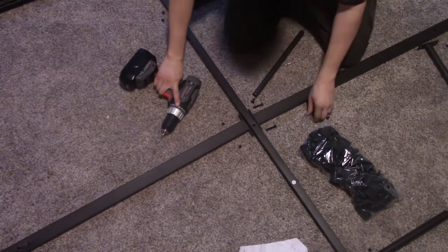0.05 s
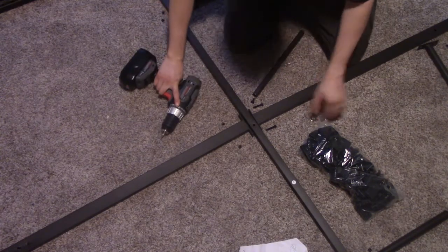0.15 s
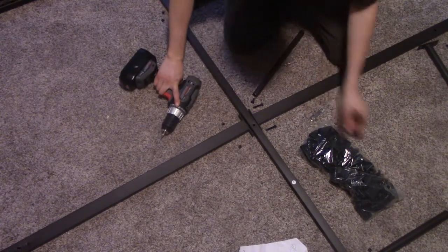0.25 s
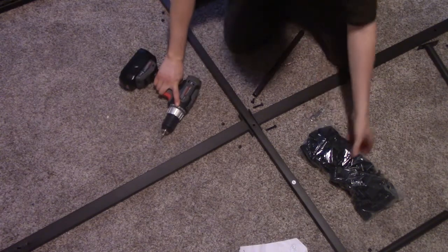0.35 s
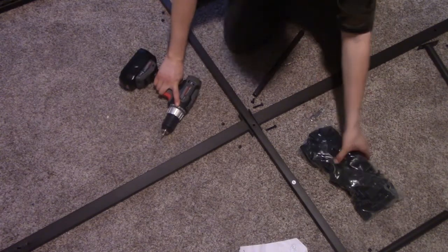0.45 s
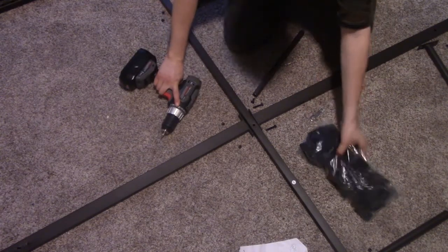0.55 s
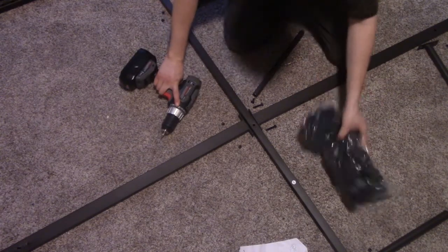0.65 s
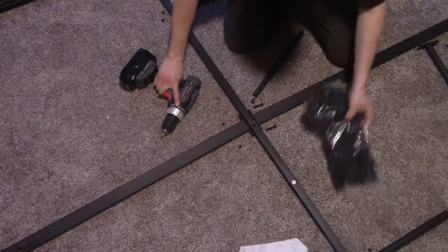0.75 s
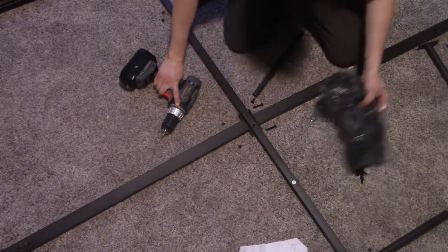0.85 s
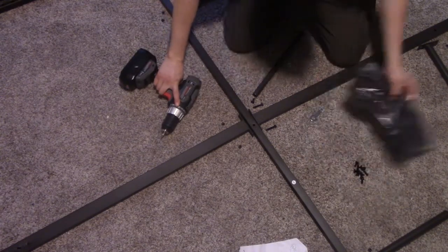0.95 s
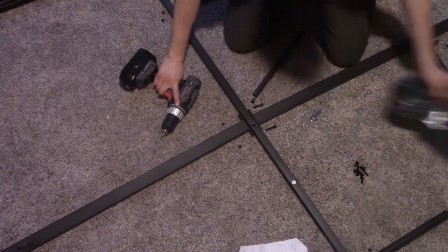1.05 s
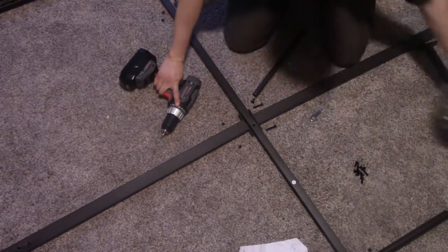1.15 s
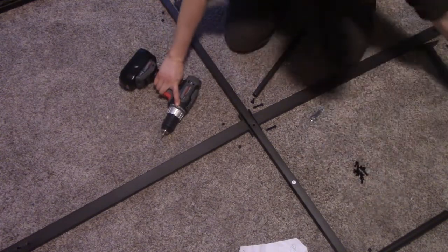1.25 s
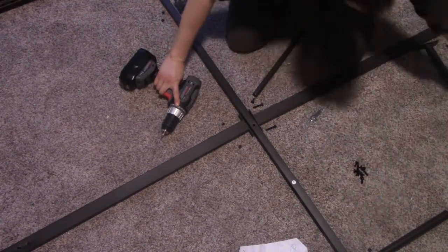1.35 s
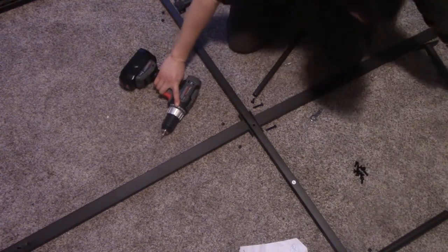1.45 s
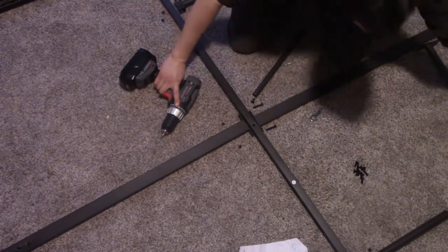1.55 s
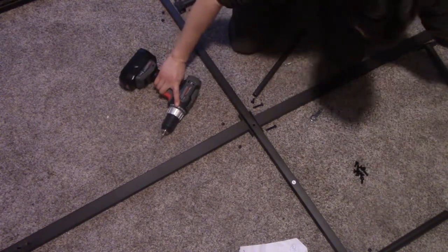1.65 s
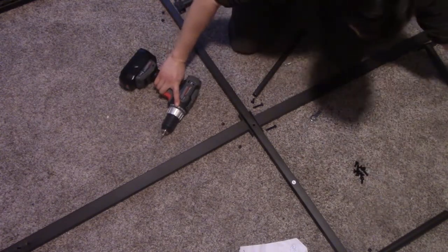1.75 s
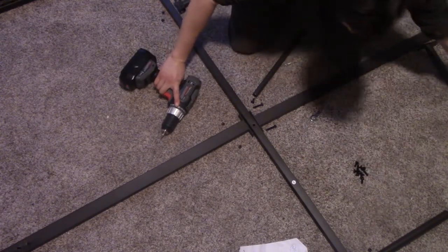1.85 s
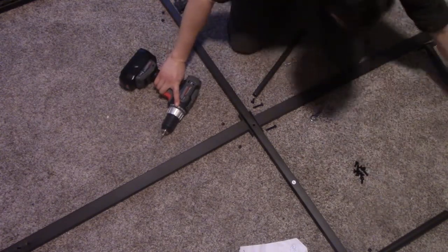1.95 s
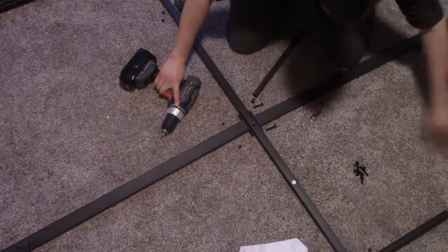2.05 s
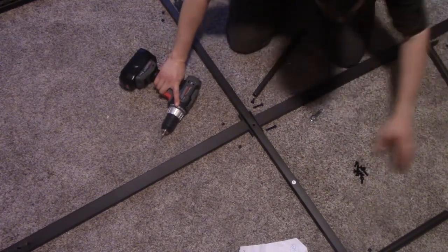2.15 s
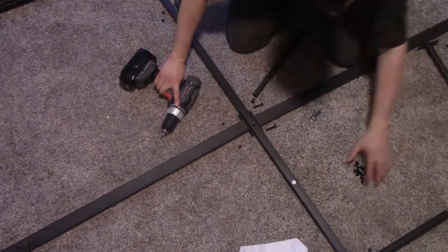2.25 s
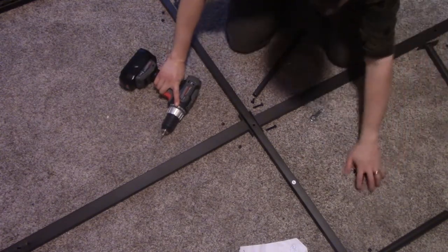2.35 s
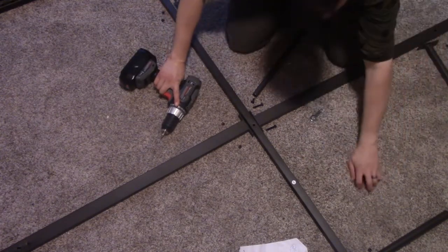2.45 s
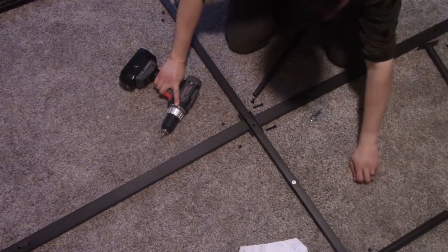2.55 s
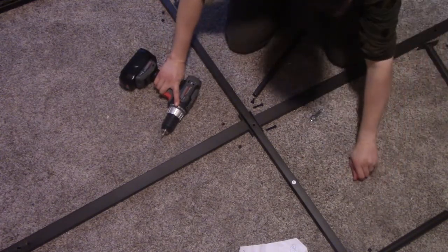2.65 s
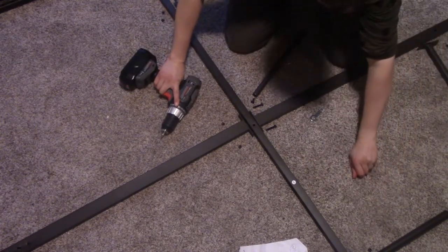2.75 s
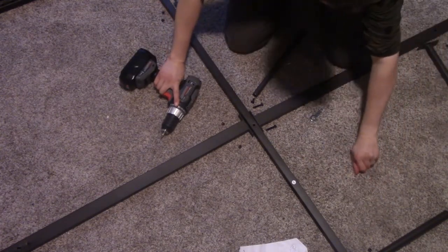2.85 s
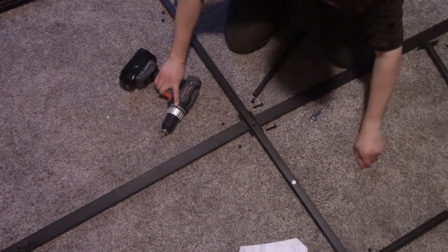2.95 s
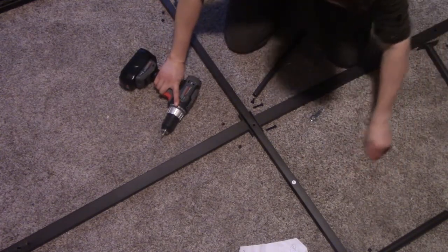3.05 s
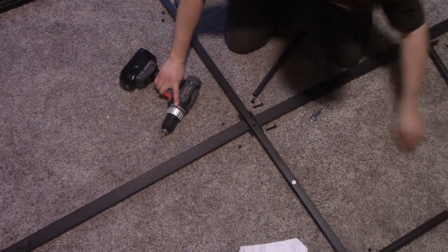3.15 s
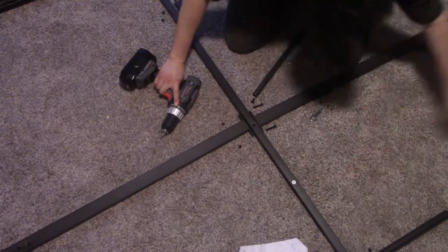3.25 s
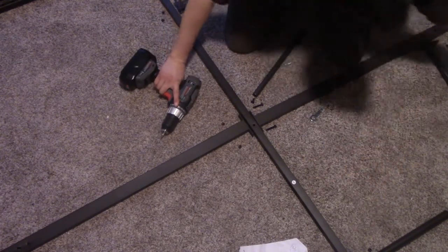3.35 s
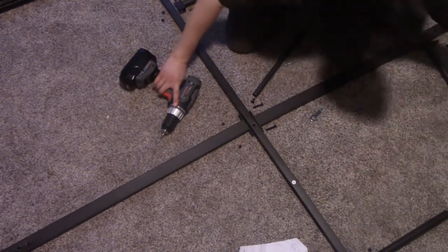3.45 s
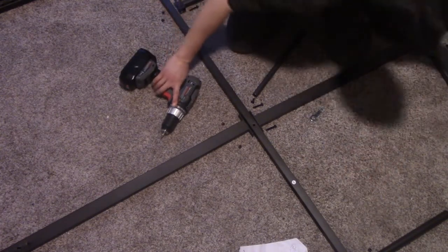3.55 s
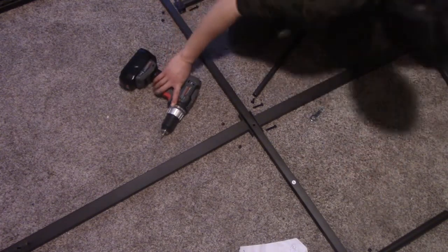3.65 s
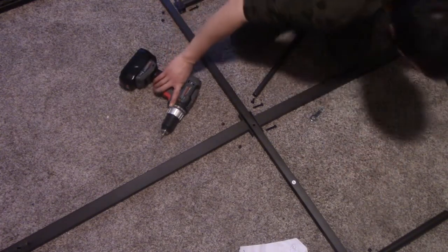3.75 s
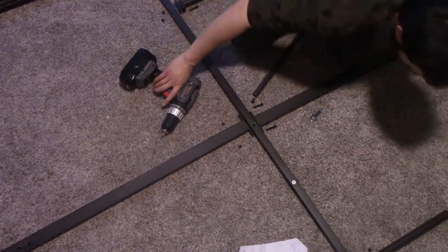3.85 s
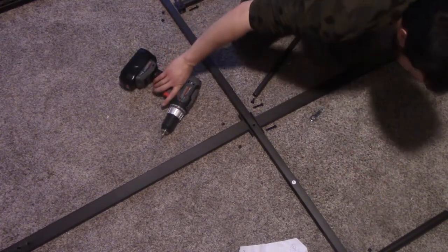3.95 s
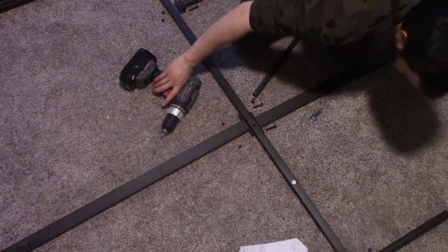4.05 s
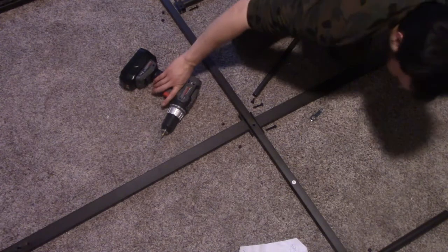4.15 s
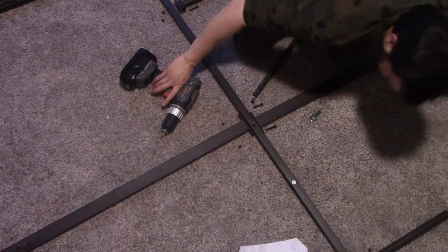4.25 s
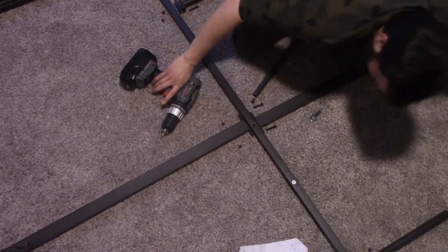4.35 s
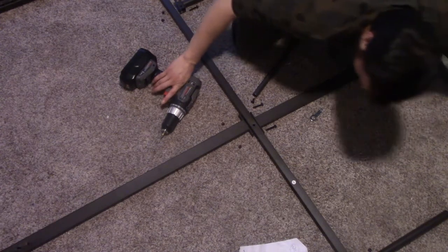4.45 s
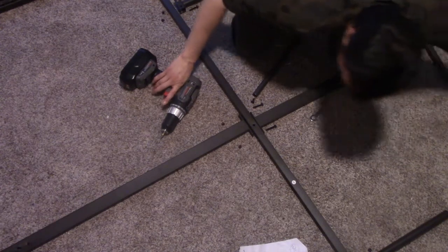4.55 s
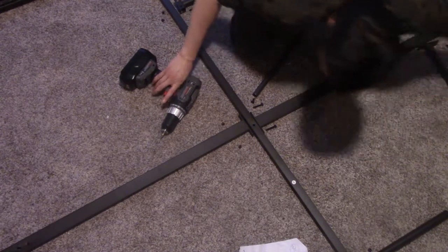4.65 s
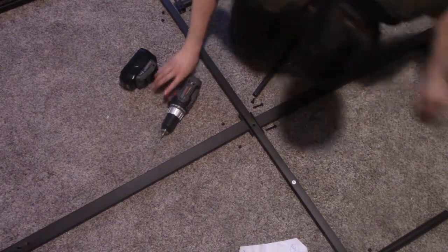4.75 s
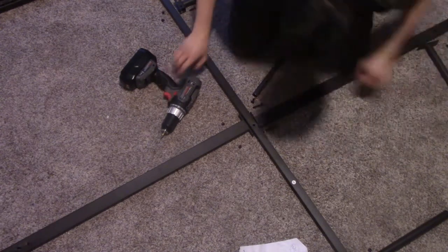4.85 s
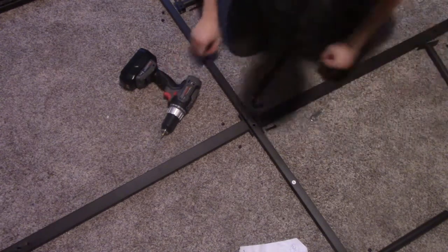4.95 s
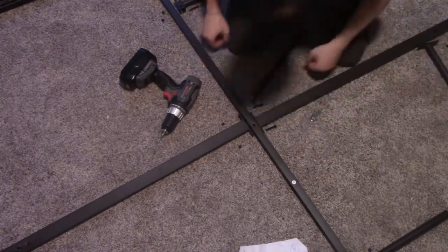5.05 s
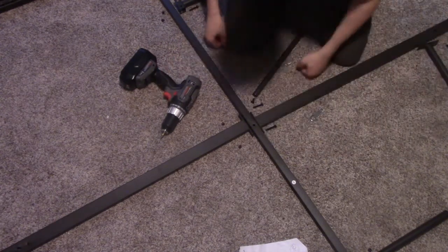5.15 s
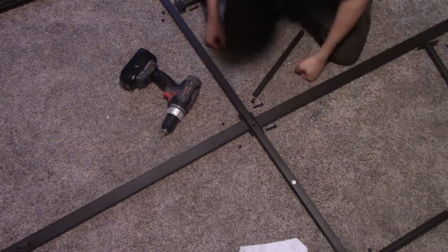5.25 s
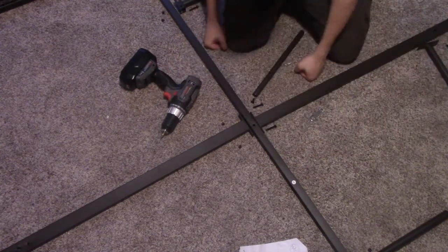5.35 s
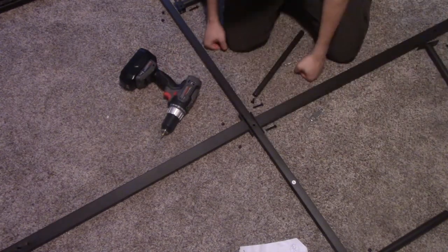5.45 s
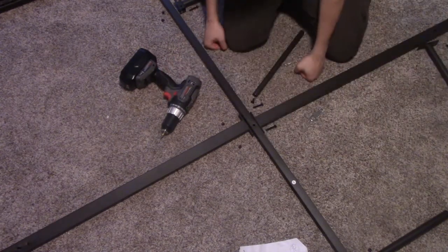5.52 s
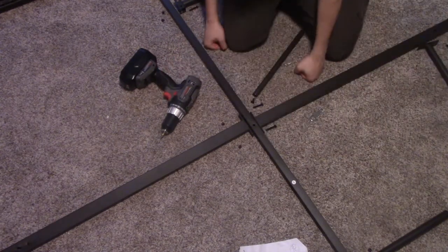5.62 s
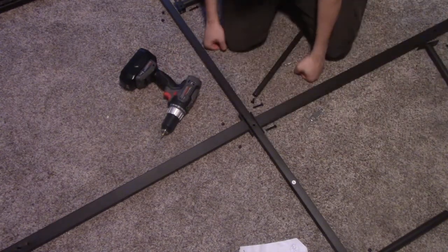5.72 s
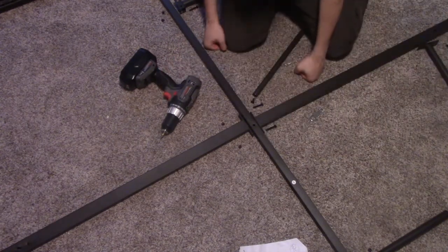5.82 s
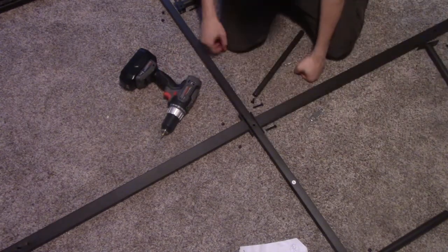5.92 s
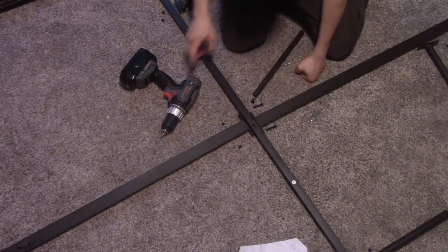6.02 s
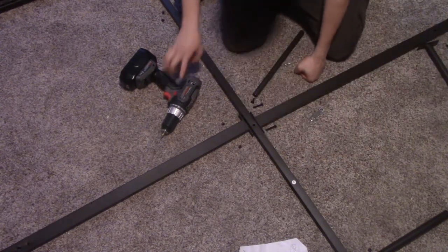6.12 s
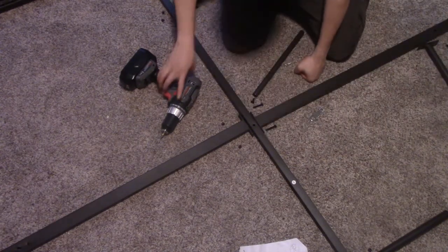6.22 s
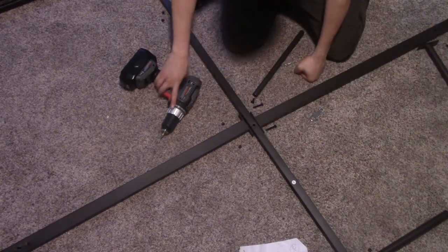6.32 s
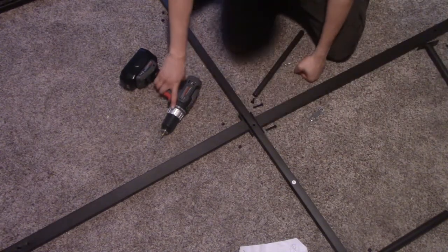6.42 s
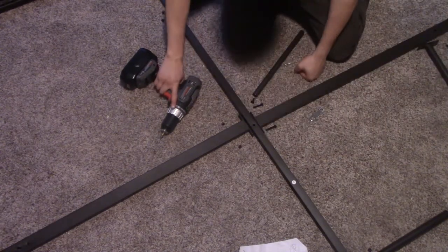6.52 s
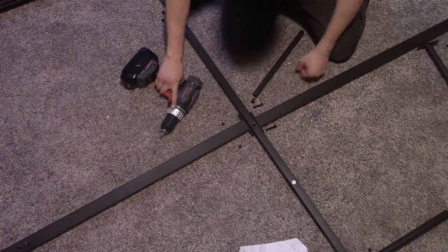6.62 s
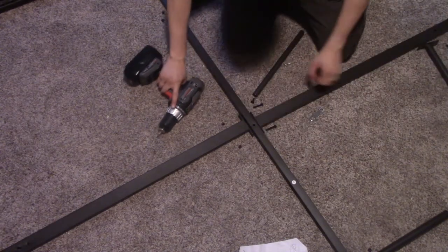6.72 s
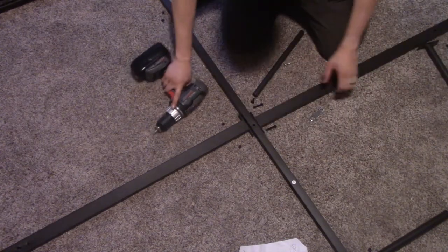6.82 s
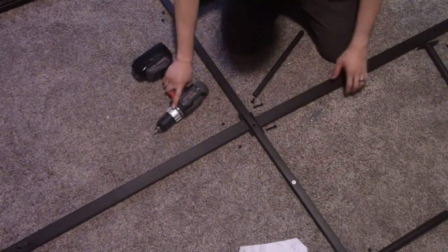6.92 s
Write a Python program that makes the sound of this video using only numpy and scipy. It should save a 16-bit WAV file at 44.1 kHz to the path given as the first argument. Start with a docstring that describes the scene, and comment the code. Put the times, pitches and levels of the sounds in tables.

```python
"""Someone kneeling on carpet assembles a metal bed frame. A plastic bag of hardware is grabbed, carried aside and
dropped: its film crinkles in streams of tiny snaps, and its steel parts clack as sums of dying modes. Loose bolts,
heard as ticks and damped beating tones, jingle while a hand sweeps them over the pile, a rustle of fine grains.
The bag is crushed again and let go, then clothes shift in fine rustles. Soft low modes bump the floor now and then;
dense reflections of filtered noise follow every source, over a steady hush with a faint whirr."""
import sys
import numpy as np
from scipy import signal
from scipy.fft import rfft, irfft
from scipy.io import wavfile

SR = 44100
rng = np.random.default_rng(int(sys.argv[2]) if len(sys.argv) > 2 else 0)


def inscribe(sig):
    """Save sig as 16-bit PCM at rate SR to the path in sys.argv[1].

    A 1-D sig is mono; a 2-D sig holds one channel per row.
    Samples are clipped to [-1, 1] before scaling.
    """
    pcm = np.round(np.clip(np.atleast_2d(sig).T, -1, 1) * 32767)
    wavfile.write(sys.argv[1], SR, pcm.astype(np.int16))


N = 307818
TIME = np.arange(N) / SR  # s

# The bag is grabbed, carried aside, dropped, touched, crushed, let go and left to settle.
# Each row: start in seconds, rise in seconds, hold in seconds, fade in dB per second, level in dB,
# hollow body in dB relative, crispness in dB relative, share packed round the hardware from 0 to 1.
BAG_SQUEEZES = [(0.403, .018, 0.15, 51.5, -35, -4, -6, 0.15), (1.04, 0.2, 0.2, 61.5, -44, -5.5, -8.5, 0.18),
                (1.511, 0.018, 0.036, 382, -18, -7, -10.5, 0.9),
                (3.831, 0.0041, 0.0043, 330, -46, -19, -20, 1),
                (3.973, .022, 0.018, 75, -27.8, -8, -11.5, 1),
                (4.251, 0.096, 0.053, 230, -43.5, -2, -9, 0.87),
                (4.486, 0.017, .01, 200, -58.5, -1, -6, 0.8)]
# Colour of the plastic film held loose. Each row: frequency in Hz, gain in dB.
LOOSE_FILM_COLOUR = [(20, -59), (60, -41.5), (110, -22.5), (190, -5.5), (330, -2), (900, -4.5), (1500, 3.5),
                     (2650, 3), (3500, -3), (5300, -12.5), (9500, -16), (12000, -26), (15500, -32.5)]
# Colour of the film packed round the hardware. Each row: frequency in Hz, gain in dB.
PACKED_FILM_COLOUR = [(20, -65), (55, -39), (110, -16), (210, -11.5), (450, -6.5), (700, -4), (1500, -7),
                      (2300, -4), (3300, -8), (5700, -17.5), (10000, -25), (12000, -31.5), (15500, -45.5)]
BODY_LAG_S, BODY_FADE_SHARE = 0.0058, 0.82  # broad folds start later than creases and fade at this share of their speed
LIGHT_SNAPS_PER_S, FORCE_SNAPS_PER_S = 900, 20000  # creases snapping under the lightest touch, and more at full level

# Sharp cracks from single folds snapping over or fingers tapping.
# Each row: start in seconds, peak in dB before the microphone response, treble in dB relative.
FOLD_SNAPS = [(0.413, -31, -22), (0.555, -14, -16.5), (0.692, -14, -31), (0.76, -26, -20),
              (0.827, -19.5, -11.5), (0.965, -20.5, -8), (1.255, -29.5, -13), (1.378, -22, -35),
              (2.747, -32, -19), (2.804, -32, -12), (3.835, -28, -12), (3.97, -25.5, -9),
              (3.979, -24, -23.5), (3.991, -12.5, -49), (3.9963, -23, -30), (4.07, -15.5, -9),
              (4.697, -38, -3), (6.238, -36, -24)]
SNAP_HZ = 2300  # the filter of a crack turns from its low end to its treble here

# The hardest knocks between the parts in the bag. Each row: start in seconds, strength in dB before the trim.
HARD_KNOCKS = [(1.5285, -8), (1.538, -3.5), (1.5433, -1.7), (1.5455, -3.5), (1.559, -3), (1.564, -9),
               (1.575, -10.5), (1.587, -11.5), (1.598, -17), (1.65, -27.5), (3.835, -30), (3.997, -9.5),
               (4.068, -17), (4.110, -17.5), (4.510, -36.5)]
# Modes of those steel parts at their middle pitch. Each row: frequency in Hz, level in dB, 60 dB decay in seconds.
STEEL_MODES = [(685, -40, .15), (1539, -23, .06), (1766, -28, 0.23), (1910, -20.5, .08), (2170, -25.5, .14),
               (2318, -20.5, .11), (2327, -21, .12), (2368, 1, 0.013), (2550, -15, .1), (2770, -16, .09),
               (2910, -26, .08), (3250, -19.5, .08), (4100, -17, 0.048), (4540, -17, .03),
               (6800, -19.5, .012), (8000, -24.5, .01)]
# Lesser knocks as a packed bag is moved: rate, level over the squeeze before the trim, scatter, share of detuning.
RATTLE_PER_S, RATTLE_DB, RATTLE_SPREAD_DB, RATTLE_DETUNE = 130, 1, 3, .07

# Bolts touching. Each row: start in seconds, level in dB before the trim, pitch in Hz,
# time in seconds until fingers or neighbours have stilled it.
BOLT_TOUCHES = [(0.836, -28.5, 10430, 0.091), (2.396, -58, 10450, .065), (2.481, -24, 10400, 0.0035),
                (2.548, -28, 9200, 0.0057), (2.6, -39, 10160, 0.017), (2.746, -28, 9370, .003),
                (2.749, -25, 7500, 0.0034), (2.804, -37, 8100, .004), (2.827, -33, 7200, 0.0054),
                (2.886, -19.5, 6760, .0022), (3.445, -30, 9700, 0.0053), (3.677, -45, 10450, .024),
                (3.713, -33, 6370, .007), (4.201, -31, 10430, 0.23)]
HALF_CLEAN_S = 0.023  # a bolt left free this long is half ring, half tick
# Small touches while the bolts are swept together: middle values and scatter, the level before the trim.
JINGLE_START_S, JINGLE_PER_S, JINGLE_STILL_S = 2.468, 54, 0.0044
JINGLE_DB, JINGLE_SPREAD_DB, JINGLE_HZ, JINGLE_SPREAD_HZ = -32.5, 8, 10550, 250

# A hand sweeps the bolts together, then closes on them.
# Each row: middle in seconds, length in seconds, level in dB, body in dB relative, pile hiss in dB relative.
HAND_SWEEPS = [(2.5, .45, -55.5, 5.5, -8.5), (2.87, .41, -58, 7.5, -35)]
# Colour of rubbed carpet pile. Each row: frequency in Hz, gain in dB.
CARPET_COLOUR = [(20, -54.5), (60, -11), (110, -2), (170, -2), (400, 2), (570, 4), (1000, -1), (1600, -5),
                 (3000, -13), (5000, -27), (6500, -18), (10500, -27), (15500, -37)]
# Sleeves and trousers shift.
# Each row: middle in seconds, length in seconds, level in dB, body in dB relative, hiss in dB relative.
CLOTHES_SHIFTS = [(3.705, 0.1, -57.5, 1, -5.5), (3.88, .26, -60.5, 1.5, -9), (5.13, .5, -67, 2, -4),
                  (5.62, .24, -66, 4, -10), (6.255, .05, -57, 1, -12), (6.36, .34, -69.5, 5.5, -4.5),
                  (6.73, 0.45, -62.5, -1, -9.5)]
# Colour of rubbed cloth. Each row: frequency in Hz, gain in dB.
CLOTH_COLOUR = [(20, -43), (100, -4.5), (200, -1.5), (450, -0.5), (1000, -2), (2400, -3.5), (3500, -12),
                (6000, -20.5), (10000, -24), (15500, -47)]
ARCH_POWER = 1.16  # of the half sine that a stroke swells and fades by

# Knees, knuckles and the drill bumping the floor.
# Each row: start in seconds, level in dB before the trim and soft onset, mode frequency in Hz.
FLOOR_BUMPS = [(1.532, -33, 215), (2.37, -46, 202), (2.471, -40, 170), (2.598, -37.5, 154),
               (3.70, -43.5, 248), (5.089, -42, 180), (6.245, -43, 210)]
BUMP_T60_S = .15

# Reverberation of the room. Each row: frequency in Hz, 60 dB decay in seconds.
ROOM_DECAY = [(100, 0.35), (400, 0.68), (1000, 0.98), (2700, 0.7), (5500, 0.76), (8000, 0.52),
              (14000, 0.41)]
# Width of the echoes before a small lift. Each row: frequency in Hz, side over mid in dB.
ECHO_SPREAD = [(30, -20), (160, -19.5), (1000, -21.5), (2500, -18), (5000, -11), (9000, -10.5),
               (15000, -17.5)]
# Colour of the room tone. Each row: frequency in Hz, relative density in dB per Hz.
HUSH_COLOUR = [(15, -51), (25, -20.5), (49, -20), (133, -6.5), (209, -3), (281, -4), (378, -2), (410, -4),
               (469, -4.5), (509, -4), (895, -7.5), (1200, -8.5), (2060, -13), (5430, -20), (15500, -32.5)]
HUSH_RMS_DB = -58.5
# Width of the room tone. Each row: frequency in Hz, side over mid in dB.
ROOM_TONE_SPREAD = [(60, -1.5), (130, -7), (290, -6), (640, -6.5), (1410, -8.5), (3100, -9), (6820, -10),
                    (15000, -22)]
# The microphones lose the deep bass, and a standing wave of the room lifts the low notes.
# Each row: frequency in Hz, gain in dB.
MICROPHONE_RESPONSE = [(15, -41), (40, -26.5), (70, -11), (110, -5), (160, -2), (215, 1), (330, 0.5),
                       (450, 0), (16000, 0)]
EDGE_HZ = 15850  # upper band limit


def amp(db):
    """Logarithmic level: decibels become a linear amplitude ratio."""
    return 10 ** (np.asarray(db) / 20)


def read(points, hz):
    """Log-frequency interpolation: a table of (Hz, value) is joined by straight lines."""
    f, value = np.transpose(points)
    return np.interp(np.log(hz + 1), np.log(f + 1), value)


def evened(x):
    """Power normalisation: the signal is scaled to rms 1."""
    return x / np.sqrt(np.mean(x ** 2) + 1e-20)


def add(mix, s, sound):
    """Superposition: a sound is summed into the mix at time s."""
    part = mix[round(s * SR):][:len(sound)]
    part += sound[:len(part)]


def colour(x, points, size=4096):
    """Minimum-phase filtering: a (Hz, dB) magnitude fixes a causal response through the Hilbert transform."""
    log_gain = np.log(amp(read(points, abs(np.fft.fftfreq(size, 1 / SR)))))
    spectrum = np.exp(np.conj(signal.hilbert(log_gain)))
    taps = np.fft.ifft(spectrum).real[:size // 2]
    return signal.oaconvolve(x, taps)[:len(x)]


def band(x, lo_hz, hi_hz):
    """Band-pass filtering: the spectrum is kept between two soft edges."""
    hz = np.fft.rfftfreq(len(x), 1 / SR) + 0.0011  # offset avoids division by zero
    passed = rfft(x) / (1 + (lo_hz / hz) ** 8) / (1 + (hz / hi_hz) ** 8)
    return irfft(passed, len(x))


def ring(t, hz, t60):
    """Damped resonance: a mode is a sine that loses 60 dB in t60 seconds."""
    return np.sin(2 * np.pi * hz * t) * np.exp(-np.log(1000) * t / t60)


def crackle(length, per_s, spread_db, grain_s, count=16):
    """Shot noise: uneven tiny snaps fall at random, each from one of a few folds with its own short random shape."""
    t = np.arange(256) / SR
    happens = rng.random(length) < per_s / SR
    size = amp(spread_db * np.minimum(rng.exponential(1, length), 4.5)) * happens
    fold = rng.integers(0, count, length)
    shapes = rng.standard_normal((count, len(t))) * np.exp(-t / grain_s)
    return sum(signal.oaconvolve(size * (fold == k), evened(shapes[k]))[:length] for k in range(count))


def rustle(material, body, mid, crisp, per_s, spread_db):
    """Scale of the radiator: broad folds give a stream of snaps its body, tight creases its crisp top."""
    x = colour(crackle(len(mid), per_s, spread_db, grain_s=0.00064), material)
    low = evened(band(x, 0, 1100))
    middle = evened(band(x, 1100, 5200))
    top = evened(band(x, 5200, SR))
    return body * low + mid * middle + crisp * top


def envelope(t, rise_s, hold_s, fade_db_per_s):
    """Attack and exponential decay: the amplitude rises in a straight line, holds, then dies away."""
    rise = np.clip(t / rise_s, 0, 1)
    return rise * amp(-fade_db_per_s * np.maximum(t - rise_s - hold_s, 0))


def bag(uneven_db=1.5, slips_per_s=35):
    """Buckling of thin film: each squeeze snaps creases, more densely the harder it is; the grip slips unevenly."""
    out, t = np.zeros(N), np.arange(SR) / SR
    hz = np.geomspace(20, 15500, 80)
    for s, rise_s, hold_s, fade, db, body_db, crisp_db, packed in BAG_SQUEEZES:
        film_db = (1 - packed) * read(LOOSE_FILM_COLOUR, hz) + packed * read(PACKED_FILM_COLOUR, hz)
        film = np.transpose([hz, film_db])
        slips = rng.standard_normal(size=128)
        force = amp(db + uneven_db * np.interp(t * slips_per_s, np.arange(len(slips)), slips))
        creases = force * envelope(t, rise_s, hold_s, fade)
        folds = force * envelope(t - BODY_LAG_S, rise_s, hold_s, fade * BODY_FADE_SHARE)
        per_s = LIGHT_SNAPS_PER_S + FORCE_SNAPS_PER_S * amp(db)
        body, crisp = amp(body_db) * folds, amp(crisp_db) * creases
        add(out, s, rustle(film, body, creases, crisp, per_s, spread_db=2.0))
    return out


def snaps(decay_s=.0007, low_db=-10, grit_db=-7):
    """Snap-through or impact: a single fold or fingertip gives one sharp kick and a millisecond or so of grit."""
    out, t = np.zeros(N), np.arange(1024) / SR
    for s, db, treble_db in FOLD_SNAPS:
        kick = (t == 0) + amp(grit_db) * rng.standard_normal(len(t)) * np.exp(-t / decay_s)
        low_end = [(20, -60), (100, -25), (500, low_db), (SNAP_HZ, 0)]
        crack = colour(kick, low_end + [(10000, treble_db), (15500, treble_db - 18)])
        add(out, s, amp(db) * crack / abs(crack).max())
    return out


def clack(gain_db=-5, tick_db=-11, tick_s=.0008, uneven_db=2):
    """Modal excitation: steel parts land one after another, each contact ringing the modes in its own proportions."""
    out, t = np.zeros(N), np.arange(SR // 4) / SR
    rings = np.array([amp(mode_db) * ring(t, hz, t60) for hz, mode_db, t60 in STEEL_MODES])
    hard_knocks = [(s, amp(db), 1) for s, db in HARD_KNOCKS]
    for s, gain, pitch in hard_knocks + rattle():
        signs = rng.choice([-1, 1], len(STEEL_MODES))
        shares = amp(uneven_db * rng.uniform(-1, 1, len(STEEL_MODES))) * signs
        modes = np.interp(t * pitch, t, shares @ rings)  # read faster or slower to detune
        tick = amp(tick_db) * rng.standard_normal(len(t)) * np.exp(-t / tick_s)
        add(out, s, gain * amp(gain_db) * (modes + colour(tick, PACKED_FILM_COLOUR)))
    return out


def rattle(count=18):
    """Random impacts: unlike parts knock as hard as the squeeze that shakes them; rows of (s, gain, pitch ratio)."""
    knocks = []
    for s, rise_s, hold_s, fade, db, _, _, packed in BAG_SQUEEZES:
        when, size, part = rng.uniform(-0.88, 1, (count, 3)).T
        age = (np.arange(count) + .5 + .5 * when) / RATTLE_PER_S
        gain = amp(db + RATTLE_DB + RATTLE_SPREAD_DB * size) * envelope(age, rise_s, hold_s, fade)
        if packed > .5:
            knocks += zip(s + age, gain, 1 + RATTLE_DETUNE * part)
    return knocks


def bolts(gain_db=-1, tick_db=-5, tick_s=.0009, twin_db=-16, twin_hz=17):
    """Beating of near-equal bending modes: a gritty tick, then a pair damped ever harder as the bolt settles."""
    out, t = np.zeros(N), np.arange(SR // 2) / SR
    for s, db, hz, still_s in BOLT_TOUCHES + gathering():
        clean = still_s / (still_s + HALF_CLEAN_S)
        scrape = rng.standard_normal(len(t)) * np.exp(-t / tick_s)
        around_pitch = [(0.9 * hz, -5), (hz, 5), (1.19 * hz, -6)]
        tick = colour(scrape, [(20, -60), (500, -20), (2500, -7)] + around_pitch + [(15500, -10)])
        pair = np.sin(2 * np.pi * hz * t) + amp(twin_db) * np.sin(2 * np.pi * (hz + twin_hz) * t)
        tone = pair * np.exp(-np.log(1000) * (t / still_s) ** 2)
        add(out, s, amp(db + gain_db) * (clean * tone + (1 - clean) * amp(tick_db) * tick))
    return out


def gathering(count=10):
    """Random collisions: bolts nudge one another under the sweeping hand; rows like BOLT_TOUCHES."""
    when, size, pitch, grip = rng.uniform(-0.9, 1, (count, 4)).T
    s = JINGLE_START_S + (np.arange(count) + .5 * when) / JINGLE_PER_S
    db = JINGLE_DB + JINGLE_SPREAD_DB * size
    hz = JINGLE_HZ + JINGLE_SPREAD_HZ * pitch
    return list(zip(s, db, hz, JINGLE_STILL_S * np.exp(grip)))


def brush():
    """Friction of fibres: carpet pile and cloth flick past as dense streams of small grains."""
    sweeps = strokes(HAND_SWEEPS, CARPET_COLOUR, per_s=5600, spread_db=4.5)
    return sweeps + strokes(CLOTHES_SHIFTS, CLOTH_COLOUR, per_s=5400, spread_db=5.5)


def strokes(rows, material, per_s, spread_db):
    """Friction level follows speed: each stroke quickens and slows in one arch, and rustles accordingly."""
    out, t = np.zeros(N), np.arange(SR) / SR
    for middle_s, length_s, db, body_db, hiss_db in rows:
        speed = amp(db) * abs(np.sin(np.pi * np.minimum(t / length_s, 1))) ** ARCH_POWER
        body, hiss = amp(body_db) * speed, amp(hiss_db) * speed
        add(out, middle_s - length_s / 2, rustle(material, body, speed, hiss, per_s, spread_db))
    return out


def bumps(gain_db=-3, puff_db=-9, soft_s=.004):
    """Soft impact: a blow on the carpeted floor excites a low mode and a dull puff, with a gradual onset."""
    out, t = np.zeros(N), np.arange(SR // 3) / SR
    for s, db, hz in FLOOR_BUMPS:
        noise = evened(band(rng.standard_normal(len(t)), hz / 2, hz * 2))
        puff = noise * np.exp(-np.log(1000) * t / BUMP_T60_S)
        onset = 1 - np.exp(-t / soft_s)
        add(out, s, amp(db + gain_db) * onset * (ring(t, hz, BUMP_T60_S) + amp(puff_db) * puff))
    return out


def room(x, early_db=3, early_s=0.075):
    """Reverberation: dense reflections, with extra early strength, die in each band at its own speed."""
    t = np.arange(SR) / SR
    onset = np.clip((t - .002) / 0.0049, 0, 1)
    taps = rng.standard_normal(SR) * onset * amp(early_db * np.exp(-t / early_s))
    hz, frame_s, z = signal.stft(taps, SR, nperseg=256)
    decay = np.exp(-np.log(1000) * frame_s / read(ROOM_DECAY, hz)[:, None])
    tail = signal.istft(z * decay, SR, nperseg=256)[1]
    return signal.fftconvolve(x, tail / np.linalg.norm(tail))[:N]


def moving_room(x, moves_per_s=4, count=3):
    """Position-dependent reflection: sound passes round a few places, each with its own pattern of echoes."""
    places = [np.maximum(np.cos(2 * np.pi * (moves_per_s * TIME - k / count)), 0) for k in range(count)]
    total = np.sqrt(sum(place ** 2 for place in places))  # keeps the power steady
    return sum(room(x * place / total) for place in places)


def room_tone(whirr_db=-73, whirr_hz=1620, whirr_width=0.064):
    """Stationary noise: a steady broadband hush holds a faint narrow-band whirr."""
    hush = evened(colour(rng.standard_normal(N), HUSH_COLOUR))
    lo_hz, hi_hz = whirr_hz * (1 - whirr_width), whirr_hz * (1 + whirr_width)
    whirr = evened(band(rng.standard_normal(N), lo_hz, hi_hz))
    return amp(HUSH_RMS_DB) * hush + amp(whirr_db) * whirr


def scene():
    """Mid-side stereophony: all sources in the room are heard by a close pair of microphones."""
    handling = colour(bag() + snaps() + clack() + brush() + bumps(), MICROPHONE_RESPONSE)
    jingle = bolts()
    sent = amp(-3.0) * handling + amp(-5.0) * jingle  # into the room
    mid = handling + jingle + moving_room(sent) + room_tone()
    # the microphones differ only in the echoes, the room tone and a slight imbalance
    side_echoes = amp(0.9) * colour(room(sent), ECHO_SPREAD)
    side = side_echoes + colour(room_tone(), ROOM_TONE_SPREAD)
    return np.array([mid + side, mid - side]) * amp([[-.5], [.5]])


def record(dry):
    """Band limitation: a linear-phase low-pass filter removes the highest treble."""
    taps = signal.firwin(511, EDGE_HZ, window=("kaiser", 9), fs=SR)
    return signal.oaconvolve(dry, taps[None], "same")


dry = scene()
out = record(dry)
inscribe(out)
```